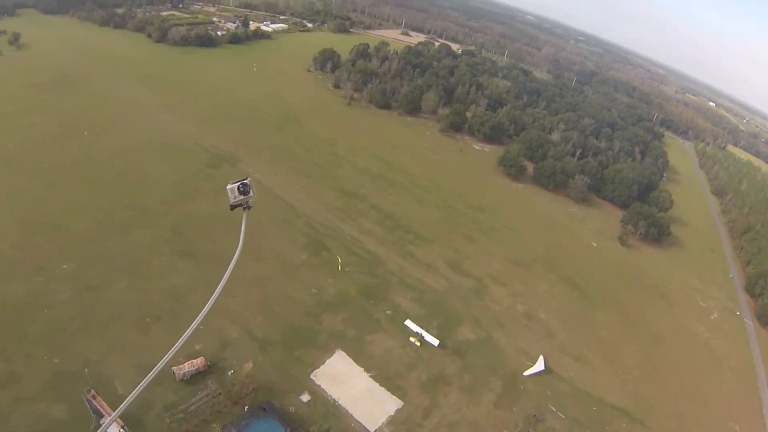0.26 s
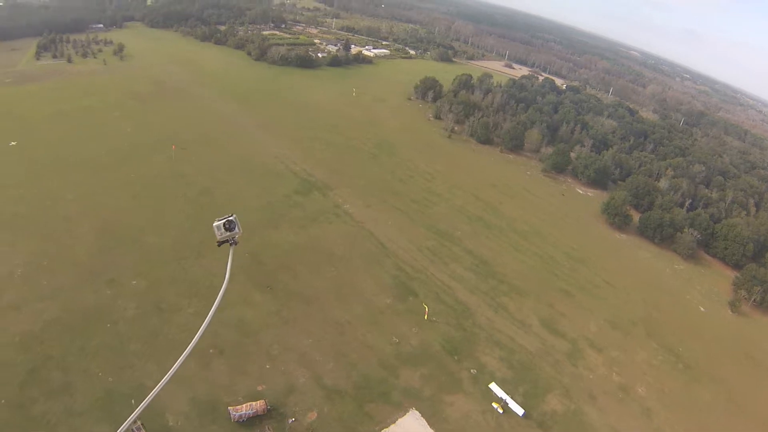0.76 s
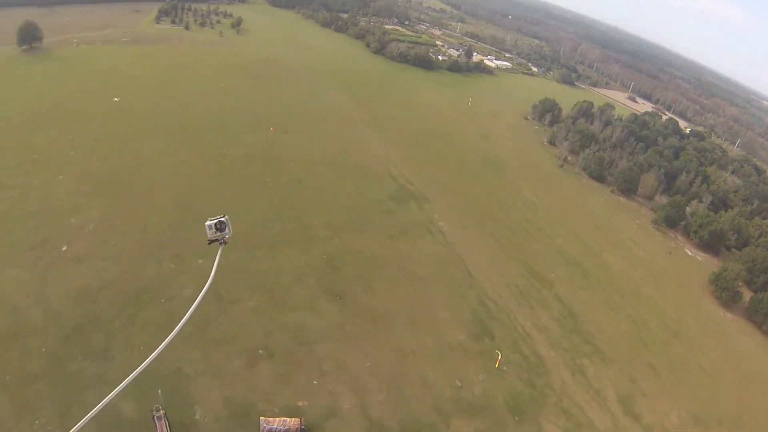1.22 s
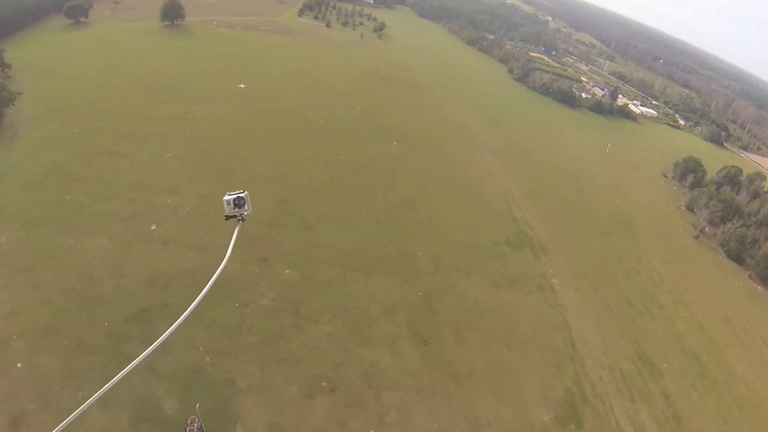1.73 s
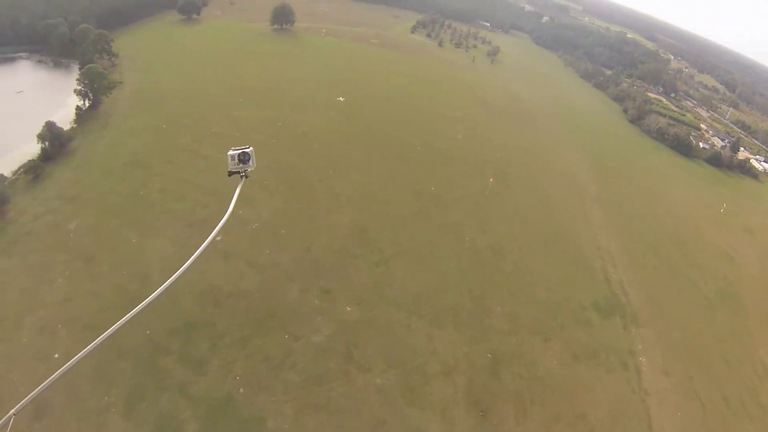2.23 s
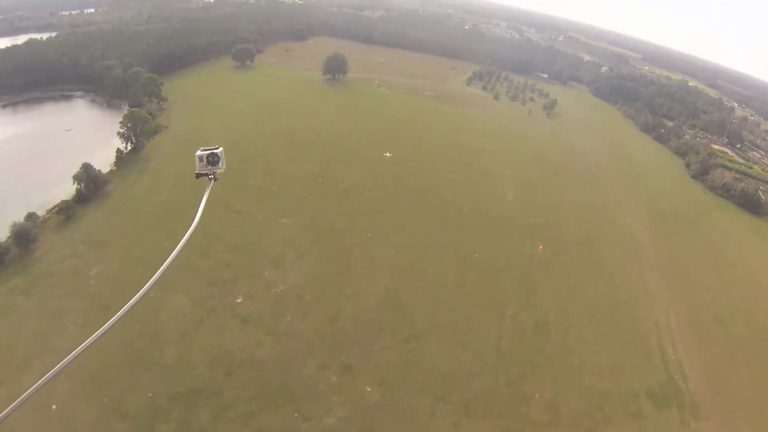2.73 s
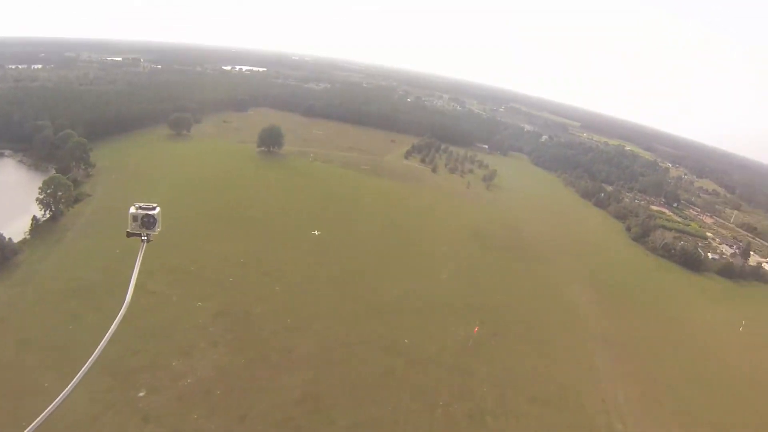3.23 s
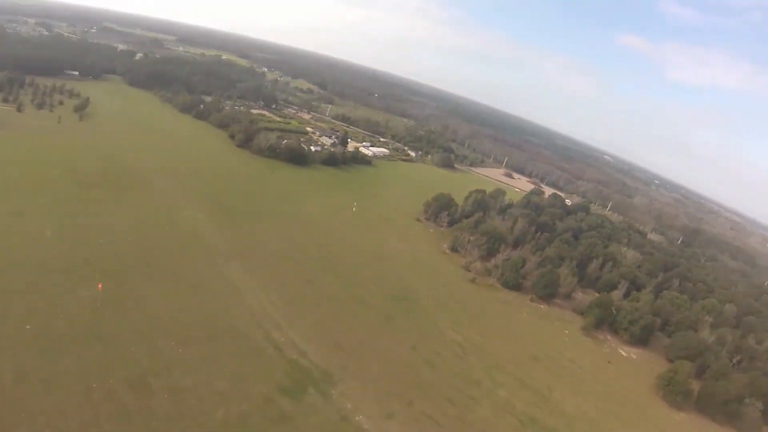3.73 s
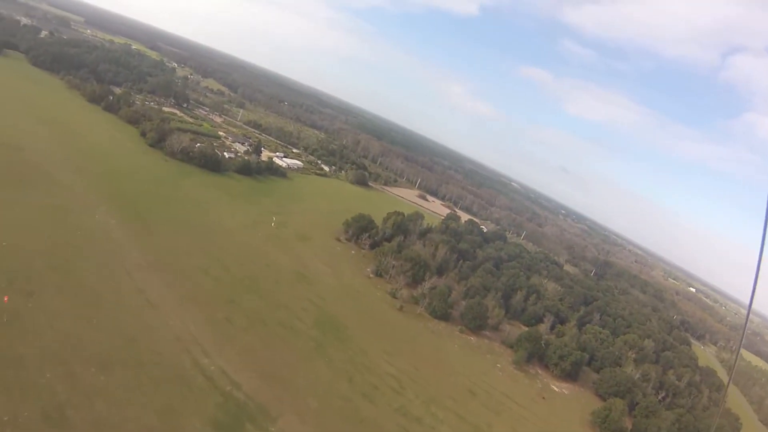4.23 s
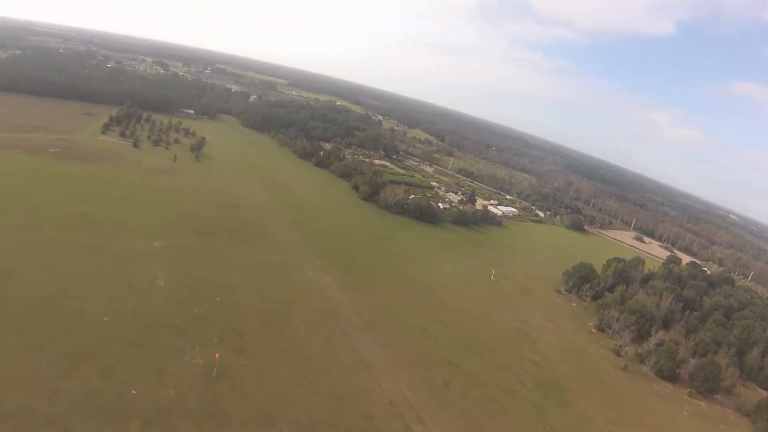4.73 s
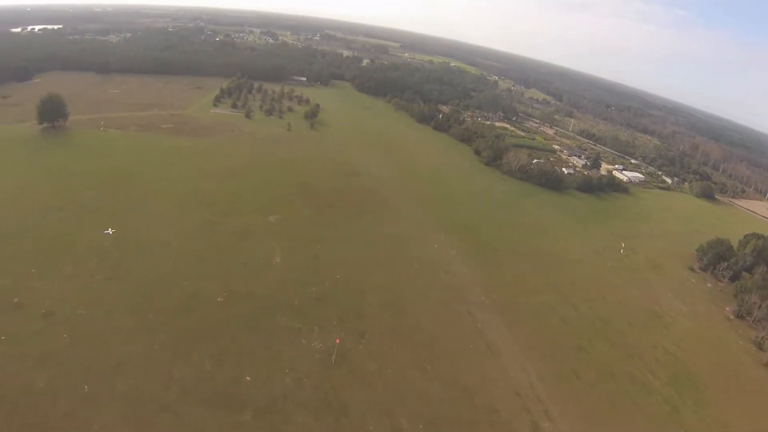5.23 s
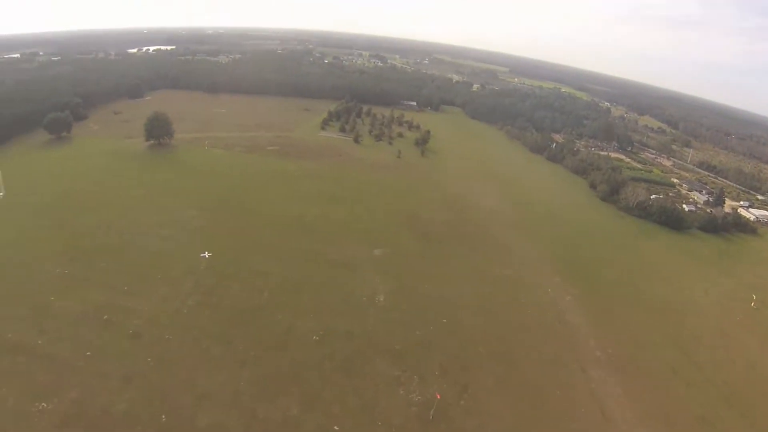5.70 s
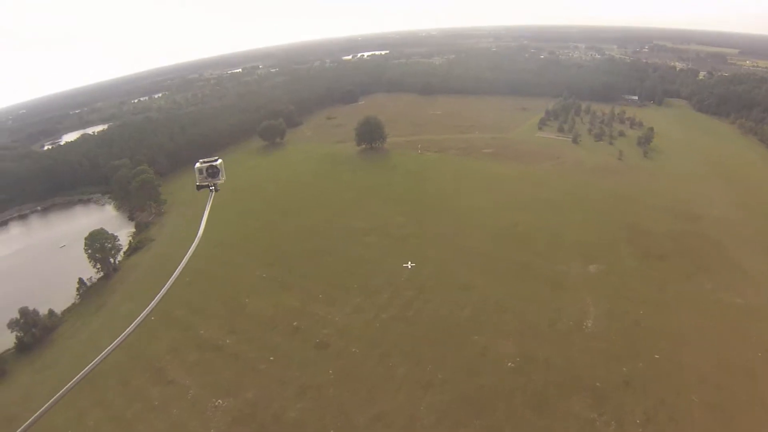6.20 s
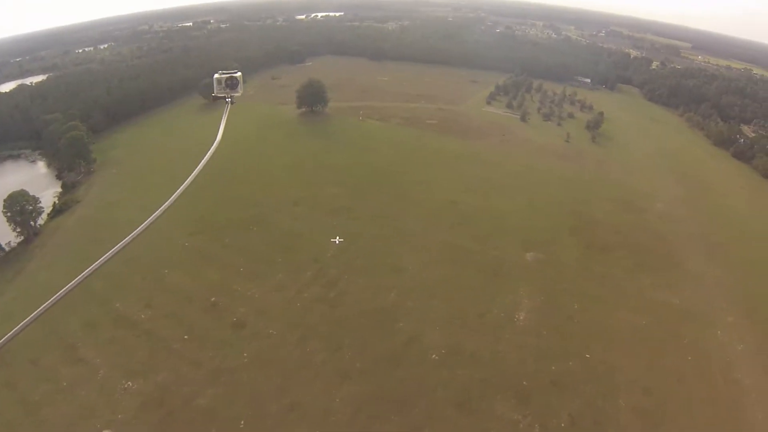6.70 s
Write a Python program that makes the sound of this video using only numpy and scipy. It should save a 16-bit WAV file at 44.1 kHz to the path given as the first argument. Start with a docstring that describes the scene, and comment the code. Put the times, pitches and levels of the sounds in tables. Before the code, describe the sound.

Aboard a glider high over fields, a microphone in a plastic case sits in the airstream. Low buffeting and a muffled rush run throughout, with thin hiss and faint airy whistles. A plastic tick snaps near two seconds. Around four seconds a banked turn brings a loud, rasping roar that collapses into uneven gusts; later the wind eases, with light ticks and one small steel clink.

```python
"""Glider wind on a cased camera

High above fields, the microphone sits in a plastic case out in the airstream of a glider.
Close on its port, eddies thump and, in one banked turn, swell to a roar with rasps at the case's edges.
The airstream is noise whose pitch rises with airspeed; hiss is fine noise coloured by the case's cavities.
Wires and edges whistle faintly as narrow noise bands. The rig ticks in double contacts that ring
its plastic mount and, clearly once, clink a small steel fitting."""
import sys
import numpy as np
from scipy.fft import rfft, irfft, next_fast_len
from scipy.io import wavfile
from scipy.ndimage import uniform_filter1d, map_coordinates

SR = 44100
rng = np.random.default_rng(int(sys.argv[2]) if len(sys.argv) > 2 else 0)


def pcm_store(signal):
    """Save signal as 16-bit PCM."""
    levels = np.round(np.clip(np.atleast_2d(signal), -1, 1) * 32767)
    wavfile.write(sys.argv[1], SR, levels.astype(np.int16).T)


N = 306495


def amp(db):
    """Decibels to gain."""
    return 10 ** (np.asarray(db) / 20)


def unit(x):
    """x at rms 1."""
    return x / np.sqrt(np.mean(x ** 2) + 1e-20)


def clock():
    """The time of every sample, in seconds."""
    return np.arange(N) / SR


def curve(rows):
    """(time, value) rows joined by straight lines, one value per sample."""
    times, values = np.transpose(rows)
    return np.interp(clock(), times, values)


def along(points, hz):
    """(Hz, value) points read on a log frequency axis."""
    f, v = np.transpose(points)
    return np.interp(np.log(hz + 1), np.log(f + 1), v)


def wobble(rate):
    """A smooth random curve with rate knots a second."""
    knots = rng.standard_normal(int(N * rate / SR) + 4)
    return map_coordinates(knots, [clock() * rate])


def arch(peak_s, length_s):
    """One smooth swell from 0 to 1 and back, centred on peak_s."""
    progress = np.clip((clock() - peak_s) / length_s + .5, 0, 1)
    return np.sin(np.pi * progress)


def filtered(x, response):
    """x times a response of frequency."""
    size = next_fast_len(N + 8192)
    spectrum = rfft(x, size) * response(np.fft.rfftfreq(size, 1 / SR))
    return irfft(spectrum, size)[:N]


def noise(spectrum):
    """Noise of rms 1 with the given colour."""
    return unit(filtered(rng.standard_normal(N), lambda hz: amp(along(spectrum, hz))))


def turbulence(spectrum, lump_db, rate):
    """Noise that arrives in quick lumps while its slow level holds steady."""
    lumpy = noise(spectrum) * amp(lump_db * wobble(rate))
    power = uniform_filter1d(uniform_filter1d(lumpy * lumpy, size=3000), size=2000)
    return lumpy / np.sqrt(np.abs(power) + 1e-9)


def carried(x, speed):
    """Eddies swept past at a changing speed: faster flow raises all their frequencies."""
    return map_coordinates(x, [np.cumsum(speed)], mode="mirror")


# strength of the airstream, which drives rush, roar and buffet: t/s, level/dB before trim
FLOW_STRENGTH = [(0, -44.5), (.6, -43), (1.25, -45), (1.9, -43), (2.12, -40), (2.3, -42.5), (2.6, -42.5),
                 (2.92, -46), (3.05, -43.5), (3.45, -43.5), (3.7, -47), (4.8, -49), (5.85, -45.5),
                 (6.15, -48.5), (6.55, -48.5), (6.82, -45.5), (6.95, -48)]


def flow_strength():
    """The airstream outside the case swells and slackens along a slow curve in dB."""
    return curve(FLOW_STRENGTH)


# large eddies at the microphone port, relative spectrum: f/Hz, level/dB per Hz
EDDY_SPECTRUM = [(10, -8), (24, 1.5), (38, 2.5), (58, 2.5), (110, -3), (160, -7.5), (260, -22.5),
                 (500, -34.5), (1500, -95)]


def buffet(level_db, roar_db, eddy):
    """Large eddies press on the microphone port, arriving faster when the flow roars."""
    roar_excess_db = np.maximum(roar_db - np.median(roar_db), 0)
    speed = amp(.3 * roar_excess_db)
    thumps = carried(turbulence(EDDY_SPECTRUM, lump_db=1.5, rate=45), speed)
    return amp(level_db + eddy) * thumps


# separated flow behind the case, relative spectrum: f/Hz, level/dB per Hz
ROAR_SPECTRUM = [(50, -11.5), (100, -1.5), (160, 1), (260, -1.5), (400, -8.5), (650, -15.5), (1000, -20.5),
                 (1400, -34), (1900, -37), (2600, -46.5), (4000, -60), (9000, -95)]


def roar(level_db, eddy):
    """Flow separates behind the case; smaller, harder eddies strike it, most of all in the turn."""
    return amp(level_db + 0.86 * eddy) * turbulence(ROAR_SPECTRUM, lump_db=1.5, rate=130)


# airstream round the case, relative spectrum before its pitch slides: f/Hz, level/dB per Hz
RUSH_SPECTRUM = [(100, -20.5), (300, 2), (520, 0.5), (750, 0), (920, -3), (1100, -11), (1350, -17),
                 (1800, -24), (2300, -39), (5000, -65)]
RUSH_OCTAVES_PER_DB = 0.0634  # rise in pitch for each dB of flow


def airstream(level_db, flow_db, eddy):
    """A broad rush whose whole spectrum slides up with airspeed."""
    speed = 2 ** (RUSH_OCTAVES_PER_DB * flow_db)
    rush = carried(turbulence(RUSH_SPECTRUM, lump_db=0.9, rate=36), speed)
    return amp(level_db + 0.3 * eddy + 2.0) * rush  # trimmed up 2 dB


# air cavities of the case round the microphone: f/Hz, width/Hz, level/dB
CASE_CAVITIES = [(1800, 360, 5.5), (2770, 570, 7.5), (3970, 740, 3), (5210, 910, 5), (6760, 400, 1)]


def cavities(hz):
    """The lift in dB that the hollows of the case give to each frequency."""
    return sum(db / (1 + (2 * (hz - centre_hz) / width_hz) ** 2)
               for centre_hz, width_hz, db in CASE_CAVITIES)


# fine turbulence, relative spectrum before the cavities: f/Hz, level/dB per Hz
HISS_SPECTRUM = [(700, 0), (1300, -2.5), (1800, -7), (2300, -9.5), (3300, -10.5), (5300, -13.5),
                 (6500, -16.5), (8000, -19.5), (9000, -22), (11300, -22), (13000, -29), (14200, -35),
                 (15000, -35)]
# the hiss changes as the case turns in the air: t/s, level/dB before trim
HISS_LEVEL = [(0, -61.7), (.55, -60), (1.25, -62.5), (1.9, -60), (2.08, -57.5), (2.7, -59), (2.95, -61),
              (3.48, -60.5), (3.6, -64), (4.45, -65), (5.3, -63.5), (5.85, -63), (6.15, -65), (6.95, -65.5)]


def hiss(eddy):
    """Fine turbulence, slightly grainy, coloured by the cavities of the case."""
    grainy = rng.standard_normal(N) * amp(0.81 * wobble(500))
    air = unit(filtered(grainy, lambda hz: amp(along(HISS_SPECTRUM, hz) + cavities(hz))))
    return amp(curve(HISS_LEVEL) + 0.5 * eddy + 7.5) * air  # trimmed up 7.5 dB


# howls and whistles of wires and edges:
# mid t/s, length t/s, start f/Hz, end f/Hz, wobble rate in knots/s (sets width), level/dB before the swell
EDGE_WHISTLES = [(0.1, 0.4, 830, 777, 219, -49), (0.794, 1.17, 694.5, 656.7, 219, -50),
                 (1.83, 1.15, 419.9, 390, 290, -40), (2.4, 0.61, 1800, 1713, 169.2, -59),
                 (2.559, 0.52, 978, 1025, 89.2, -50), (2.84, 0.45, 930, 894, 101.2, -50),
                 (3.097, 0.33, 1643, 1540, 122, -58), (3.468, 0.093, 889, 893.5, 80.1, -44.5),
                 (3.66, 0.26, 1120, 1080, 328.4, -54.5), (4.25, 0.2, 520, 479.5, 239.5, -38),
                 (4.85, 0.69, 847, 840, 110.2, -53.5), (5.1, 1.1, 940.5, 1001, 379.6, -53),
                 (6.3, 0.56, 881, 840, 230, -50), (6.363, 0.94, 1270, 1302, 109.7, -61.5),
                 (6.649, 0.6, 1069, 1116, 120, -54.5), (3.182, 0.022, 7500, 6910, 300, -64),
                 (4.63, 0.29, 11700, 11200, 1290, -76), (4.87, 0.33, 11180, 11100, 1300, -77),
                 (6.529, 0.38, 12000, 11600, 1600, -76)]


def whistles():
    """Vortices shed by wires and edges swell into airy tones: wide ones howl, narrow ones whistle."""
    out = np.zeros(N)
    for mid_s, length_s, start_hz, end_hz, width, db in EDGE_WHISTLES:
        progress = np.clip((clock() - mid_s) / length_s + .5, 0, 1)
        phase = 2 * np.pi * np.cumsum(start_hz + (end_hz - start_hz) * progress) / SR
        # two slow random curves spread the tone into a narrow band
        tone = unit(wobble(width) * np.sin(phase) + wobble(width) * np.cos(phase))
        out += amp(db) * arch(mid_s, length_s) * tone
    return out


# single gusts, and lulls where negative: peak t/s, length t/s, buffet lift level/dB, roar lift level/dB
GUST_LIFTS = [(0.178, 0.16, 2.5, .5), (0.659, 1.2, -2, 2.5), (1.153, 0.043, 5.5, 1), (1.309, 0.15, -4, 0),
              (2.06, 0.12, 7.5, -1), (2.181, 0.088, 7, 0), (2.349, .12, 3, -2), (2.477, 0.046, 2, 0),
              (2.595, 0.39, 4.5, -2), (3.171, 0.29, 3, 2), (3.392, 0.1, 11, 4), (3.632, 0.12, 7, 3),
              (3.685, 0.077, -6, -5), (3.821, 0.061, 4, 2), (4.025, 0.06, -1, 3), (4.129, 0.049, -5.5, 3),
              (4.223, 0.0501, -2, 3), (4.28, 0.091, -4.5, 0.5), (4.357, 0.049, 1, 6.5),
              (4.399, .13, 4.5, 1.5), (4.44, 0.0591, 2.5, 4), (4.493, 0.0589, -1, 5), (4.641, 0.064, 9, 3),
              (4.69, 0.093, 1, 4), (4.85, 0.14, 1, -11), (4.997, 0.17, 4, 2), (5.335, 0.3, 4, 3),
              (5.355, 0.038, 5.5, 1), (5.628, 0.058, 5.5, 2), (5.983, 0.082, 3.5, 2.5),
              (6.221, 0.28, -6, -2), (6.625, .25, -2, -2.5)]


def gusts():
    """Each gust swells and fades in one smooth arch; gives the lifts of buffet and roar in dB."""
    return sum(np.outer([buffet_db, roar_db], arch(peak_s, length_s))
               for peak_s, length_s, buffet_db, roar_db in GUST_LIFTS)


# plastic on plastic, relative spectrum before case and struck spot: f/Hz, level/dB per Hz
CONTACT_SPECTRUM = [(500, -25), (1200, -11), (1600, -5), (2650, -2.5), (3450, -9), (4350, -2), (5200, -5),
                    (6000, -8), (7000, -9), (9500, -13), (12000, -10), (14300, -22), (15200, -38)]
SPOT_OCTAVES = 0.29  # half-width of the band that the struck spot colours


def snap(t, tilt_db, spot_hz, spot_db, t60):
    """One dry contact of plastic, heard through the case and coloured by the spot that is struck."""
    hz = np.fft.rfftfreq(len(t), 1 / SR)
    octaves = np.log2((hz + 1) / spot_hz)
    spot = spot_db * np.exp(-(octaves / SPOT_OCTAVES) ** 2)
    colour = amp(along(CONTACT_SPECTRUM, hz) + cavities(hz) + tilt_db * octaves + spot)
    crack = unit(irfft(rfft(rng.standard_normal(len(t))) * colour, len(t)))
    return crack * amp(-60 * t / t60) * (1 - np.exp(-t / 0.00057))


def ring(modes, t):
    """Damped modes, struck at slightly new strengths and at random phases."""
    scatter_db = rng.normal(0, 1.5, len(modes))
    return sum(amp(db + extra - 60 * t / t60) * np.sin(2 * np.pi * (hz * t + rng.random()))
               for (hz, db, t60), extra in zip(modes, scatter_db))


# modes of the plastic mount, before scatter: f/Hz, level/dB, t60 t/s
MOUNT_MODES = [(1750, -8, .015), (2080, -3, .016), (2400, 0, .018), (2750, 0, .02), (3900, -12, .012),
               (5110, -4, .024)]


def mount_ring(t):
    """The plastic mount rings briefly, with a quick soft onset."""
    return ring(MOUNT_MODES, t) * (1 - np.exp(-t / 0.00058))


# modes of a small steel fitting, before scatter: f/Hz, level/dB, t60 t/s
STEEL_MODES = [(6930, -1, .045), (7070, -5, .045), (7595, -9, .13), (8950, -3, .028), (9530, -11, .048),
               (11500, -7, .025), (12745, -16, .11), (14330, -26, .07)]


def steel_ring(t):
    """The steel fitting rings high and longer, with a slower onset."""
    return ring(STEEL_MODES, t) * (1 - np.exp(-t / 0.0025))


# ticks of the rig: t/s, reference level/dB, tilt level/dB per octave, struck spot f/Hz,
# spot lift level/dB, t60 t/s, body ring level/dB, metal ring level/dB (rings relative to the reference)
RIG_TICKS = [(1.8016, -29.5, -2.5, 2202, 7.5, 0.022, -7, -40), (2.7122, -41, -2.5, 3700, 5, 0.02, -20, -40),
             (2.799, -41, -3, 4800, 2, .015, -20, -40), (2.8983, -42.5, -4, 5200, 2, 0.023, -20, -40),
             (3.223, -45, -4, 3500, 6, .02, -20, -40), (3.3684, -45, 1, 4854, 9, .015, -20, -40),
             (3.5079, -38.5, 0, 5600, 1, 0.02, -14, -40), (5.0862, -50, 2, 7490, 5, 0.0097, -25, -40),
             (5.5027, -37.5, 0.5, 3602, 5, .011, -25, -40), (5.9372, -44, -4.5, 4990, 5, .02, -20, -40),
             (6.0136, -45.5, -5, 6600, 7, .02, -20, -14), (6.0932, -48, -4, 5300, 7, 0.023, -20, -40),
             (6.3369, -31.5, 2, 5400, -7, 0.021, -22, -9.5), (6.438, -48.5, -1, 3000, 2, .02, -20, -40)]
# flight between the two contacts of a tick of REBOUND_DB; harder ticks fly longer
REBOUND_S, REBOUND_DB, REBOUND_GROWS = .0035, -30.5, 0.32


def ticks():
    """The mount slips and catches in double contacts that ring its body and jog the steel fitting."""
    out, t = np.zeros(N + SR), np.arange(SR // 4) / SR
    for s, db, tilt_db, spot_hz, spot_db, t60, body_db, metal_db in RIG_TICKS:
        flight = REBOUND_S * amp(REBOUND_GROWS * (db - REBOUND_DB))
        for start, contact_db in ((s, -2.5), (s + flight, -10)):
            contact = amp(db + contact_db) * snap(t, tilt_db, spot_hz, spot_db, t60)
            out[round(start * SR):][:len(t)] += contact
        rings = amp(body_db) * mount_ring(t) + amp(metal_db) * steel_ring(t)
        out[round(s * SR):][:len(t)] += amp(db) * rings
    return out[:N]


TURN_START_S, TURN_ATTACK_S, TURN_HOLD_S, TURN_RELEASE_S = 3.745, .235, .37, 0.2297


def turn():
    """How far the flow breaks away from the case in the banked turn, 0 to 1: it builds, holds, collapses."""
    corners = TURN_START_S + np.cumsum([0, TURN_ATTACK_S, TURN_HOLD_S, TURN_RELEASE_S])
    return np.interp(clock(), corners, [0, 1, 1, 0])


# rasps, where the flow tears at an edge of the case: peak t/s, length t/s, level/dB
RASP_SURGES = [(3.828, 0.1, -48), (3.995, 0.084, -50), (4.137, .62, -46), (4.295, 0.11, -47.5),
               (4.503, 0.1, -52.5), (4.633, 0.061, -53)]
# small, hard eddies at that edge, relative spectrum: f/Hz, level/dB per Hz
RASP_SPECTRUM = [(400, -20), (900, 10.5), (1300, 1), (1750, 0), (2300, -8.5), (2900, -9), (3400, -15),
                 (6000, -30), (12000, -50)]


def rasps():
    """Small, hard eddies tear at the case all through the turn, with a few short surges."""
    swell = sum(amp(db) * arch(peak_s, length_s) for peak_s, length_s, db in RASP_SURGES)
    return swell * turbulence(RASP_SPECTRUM, lump_db=3.0, rate=400)


# straight flight: flow strength, and buffet and roar at that flow (dB)
CRUISE_DB, BUFFET_DB, ROAR_DB = -45, -35, -39.5
BUFFET_GROWS, ROAR_GROWS = 0.35, .7  # dB for each dB of flow
TURN_BUFFET_DB, TURN_ROAR_DB, TURN_RUSH_DB = 13, 15, 7.5  # lifts in the full turn


def scene():
    """Airflow, turn and gusts drive the wind; buffet, roar, rush and hiss flutter with the same eddies."""
    stream_db = flow_strength()
    flow_db = stream_db - CRUISE_DB
    banked, eddy = turn(), wobble(35)
    gust_buffet_db, gust_roar_db = gusts()
    buffet_db = BUFFET_DB + BUFFET_GROWS * flow_db + TURN_BUFFET_DB * banked + gust_buffet_db
    roar_db = ROAR_DB + ROAR_GROWS * flow_db + TURN_ROAR_DB * banked + gust_roar_db
    rush_db = stream_db + TURN_RUSH_DB * banked
    wind = buffet(buffet_db, roar_db, eddy) + roar(roar_db, eddy)
    wind += airstream(rush_db, flow_db, eddy) + hiss(eddy)
    return (wind + whistles() + ticks() + rasps())[None]


TOP_HZ = 15200


def record(dry):
    """The camera keeps nothing above its band limit."""
    return filtered(dry[0], lambda hz: hz < TOP_HZ)[None]


dry = scene()
out = record(dry)
pcm_store(out)
```